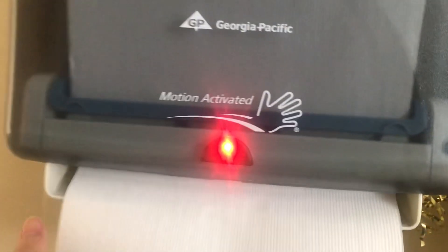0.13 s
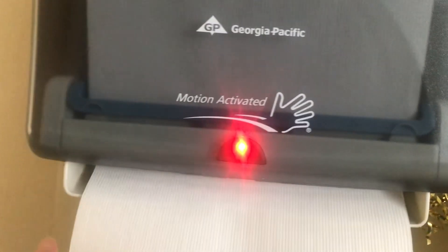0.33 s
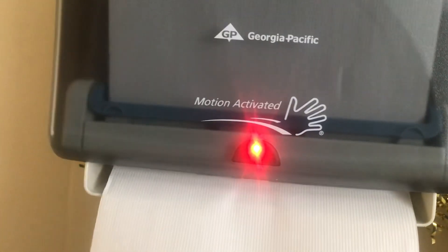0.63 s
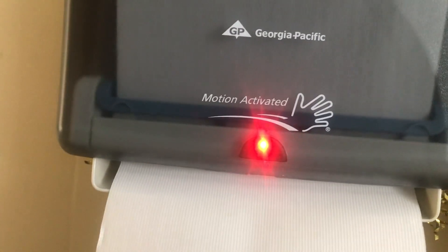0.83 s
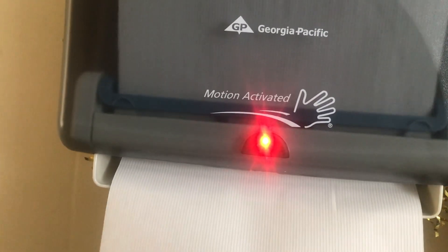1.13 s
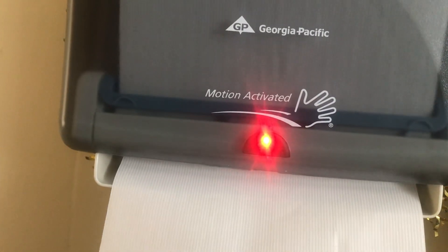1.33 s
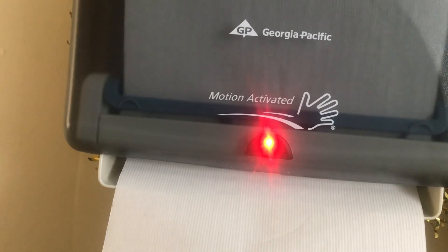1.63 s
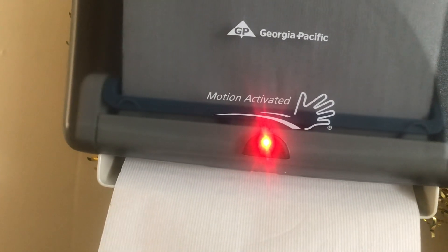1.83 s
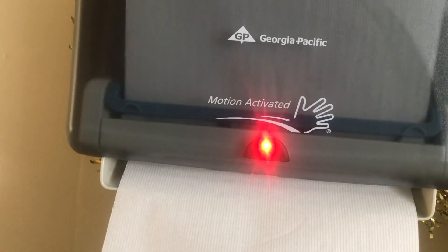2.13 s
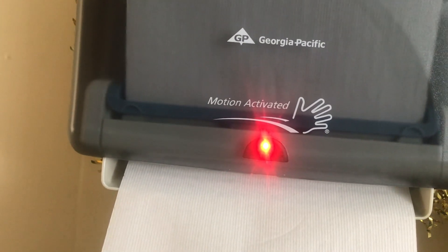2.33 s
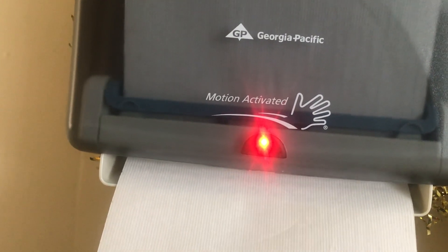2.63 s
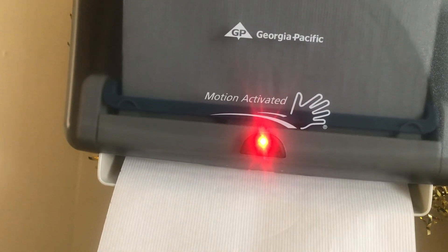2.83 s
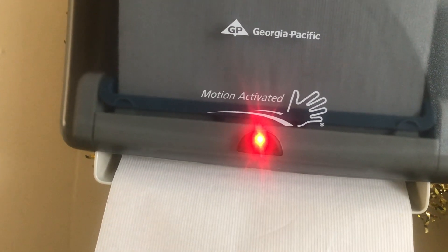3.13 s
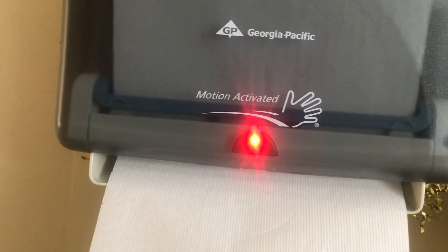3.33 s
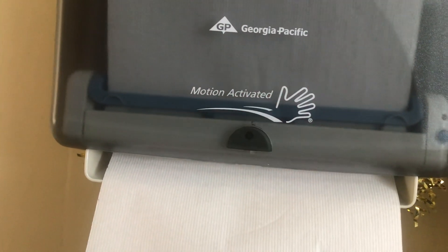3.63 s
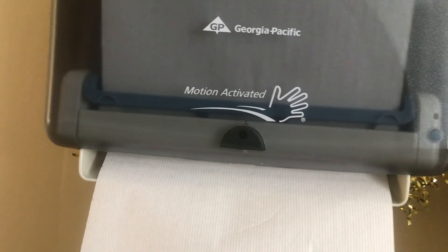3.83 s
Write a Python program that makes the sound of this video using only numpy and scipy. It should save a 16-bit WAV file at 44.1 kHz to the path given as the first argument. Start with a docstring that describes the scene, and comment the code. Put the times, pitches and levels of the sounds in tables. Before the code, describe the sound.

Paper towel dispenser motor whirring out a sheet, followed by two plastic clacks.

```python
"""Paper towel dispenser, close up

A small room, the microphone close to a motorised dispenser. Its geared motor hums, whines and rattles
the plastic case while it feeds a sheet, then is switched off and coasts to rest. Paper rustles softly,
a plastic part scrapes and clacks twice, and faint swishes of cloth pass over quiet ventilation."""
import sys
import numpy as np
from scipy import signal
from scipy.fft import rfft, irfft, next_fast_len
from scipy.io import wavfile
from scipy.ndimage import map_coordinates

SR = 44100
rng = np.random.default_rng(int(sys.argv[2]) if len(sys.argv) > 2 else 0)


def inscribe(sig):
    """Save sig as 16-bit PCM at rate SR to the path in sys.argv[1].

    A 1-D sig is mono; a 2-D sig holds one channel per row.
    Samples are clipped to [-1, 1] before scaling.
    """
    pcm = np.round(np.clip(np.atleast_2d(sig).T, -1, 1) * 32767)
    wavfile.write(sys.argv[1], SR, pcm.astype(np.int16))


N = 176400

# motor shaft under power (time [s], speed [turns/s])
SHAFT_SPEED = [(0, 135), (.035, 129), (.1, 127.2), (.21, 128.4), (.39, 130.4), (.47, 131), (.56, 127),
               (.66, 128.5), (.79, 130.6), (.92, 128), (1.0, 128), (1.06, 127.3), (1.2, 130.5),
               (1.32, 128.2)]
OFF_S, COAST_S, TEETH = 1.318, .27, 8  # power cut, time to rest, teeth on the gear
# shaft hum (time [s], level before trim [dB])
HUM_LEVEL = [(0, -46), (.05, -38), (.085, -46), (.125, -56), (.2, -46), (.33, -40), (.41, -45.5),
             (.48, -40.5), (.53, -43), (.62, -41), (.74, -37), (.81, -47.5), (.89, -39.5), (.97, -46.5),
             (1.04, -38.5), (1.15, -39.5), (1.19, -42), (1.27, -35.5), (1.33, -46)]
# gear whine (time [s], level before trim [dB])
WHINE_LEVEL = [(0.0, -31.5), (0.066, -42.5), (0.118, -35.5), (0.23, -44.5), (0.26, -38), (0.418, -33.5),
               (0.454, -47), (0.48, -32.5), (0.605, -44), (0.652, -37.5), (0.81, -40), (0.836, -58),
               (0.88, -28), (0.93, -35.5), (0.99, -38.5), (1.1, -34.5), (1.2, -31), (1.232, -40),
               (1.265, -27), (1.33, -33.5)]
# the whine's octave (time [s], level before trim [dB])
OCTAVE_LEVEL = [(0.0, -46), (0.08, -34.5), (0.336, -41.5), (0.44, -40), (0.466, -31.5), (0.532, -31.5),
                (0.602, -45), (0.636, -40), (0.81, -39.5), (0.918, -33.5), (1.05, -38), (1.13, -36.5),
                (1.222, -43), (1.274, -31.5), (1.315, -36.5), (1.335, -44)]
HUM_TRIM_DB, WHINE_TRIM_DB, OCTAVE_TRIM_DB = -1.5, -1.9, -2.5
HUM_FADE_DB_PER_S, WHINE_FADE_DB_PER_S = 196, 202  # once the power is cut
BOOM_HZ, BOOM_WIDTH_HZ, BOOM_DB = 880, 69, 14.5  # case resonance that the falling whine passes through
# whistle two octaves above the whine (time [s], level [dB])
WHISTLE_LEVEL = [(0, -52), (.09, -40.5), (.2, -48), (.27, -47.5), (.34, -52), (.65, -59), (.93, -47),
                 (1.33, -52)]
# drone at four times the shaft rate (time [s], level [dB])
DRONE_LEVEL = [(0, -48.5), (.5, -51), (.7, -55), (1.33, -56)]
# weaker tones of the gear train (frequency [multiples of the shaft rate])
GEAR_ORDERS = [2, 7.2, 9.2, 10.05, 12.65, 21, 23, 40, 64]
# the same tones, one by one (level [dB])
GEAR_ORDER_LEVELS = [-52, -53.5, -54, -49.5, -51, -58, -53.5, -53.5, -56]

# resonances of the plastic case (frequency [Hz], width [Hz], lift [dB])
CASE_RESONANCES = [(228, 48, 6.5), (603, 150, 8.5), (904, 120, 2), (1190, 420, 4.5), (1567, 87, 5),
                   (2090, 120, 2), (2658, 170, 9), (3064, 75, 8), (3720, 88, 3), (4200, 530, 6),
                   (5310, 210, 7.5), (5830, 390, 6), (6960, 270, 2.5), (8700, 490, 3)]
# gear rattle in the case (time [s], level before trim [dB])
RATTLE_LEVEL = [(0, -41), (.17, -44), (.24, -42.5), (.37, -39.5), (.6, -41), (.7, -39), (.82, -40),
                (.96, -37.5), (1.05, -39), (1.3, -38.5), (1.38, -34), (1.43, -40), (1.465, -39),
                (1.5, -44.5), (1.535, -48), (1.57, -57), (1.62, -70)]
# gears rattling under power (frequency [Hz], relative level [dB])
RATTLE_SPECTRUM = [(30, -26), (70, -4.5), (110, -4), (230, -6.5), (330, -6.5), (450, -5), (700, -12),
                   (950, -2), (1300, -4), (1600, -1.5), (2100, -5.5), (2500, -7), (3400, -16.5),
                   (4200, -20), (6000, -20.5), (15000, -40)]
# gears clattering as they coast (frequency [Hz], relative level [dB])
COAST_SPECTRUM = [(30, -29), (100, -23), (230, -5), (400, -9.5), (680, -13.5), (900, 2), (1350, -2.5),
                  (2000, -12.5), (2700, -12), (3500, -20), (6000, -27.5), (15000, -46)]
# paper sliding through the rollers (time [s], level before trim [dB])
FEED_LEVEL = [(0.0, -39), (0.708, -41.5), (0.73, -37.5), (0.756, -43), (0.846, -40.5), (1.304, -41.5),
              (1.312, -37.5), (1.42, -55), (1.466, -56), (1.564, -77), (1.576, -93), (1.6, -96)]
# hiss of the sliding paper (frequency [Hz], relative level [dB])
FEED_SPECTRUM = [(500, -20), (2000, 1), (4500, -2), (6500, -6.5), (9000, -7), (10300, -14), (12500, -9),
                 (14000, -15.5), (16000, -19)]
RATTLE_TRIM_DB, FEED_TRIM_DB = 1.94, 2.5

# ventilation (frequency [Hz], relative level [dB])
AIR_SPECTRUM = [(20, -23), (55, -1), (110, -5), (200, -11), (400, -18.5), (750, -20), (1400, -18),
                (2200, -27), (4000, -31), (6000, -31), (8000, -37), (11000, -37), (15500, -35.5)]
AIR_DB, MAINS_HZ, MAINS_DB = -63.5, 51.7, -67
# decay of the small room (frequency [Hz], t60 [s])
ROOM_DECAY = [(150, 0.36), (400, 0.21), (1800, 0.24), (5000, 0.18), (14000, 0.13)]
PLASTIC_SEND_DB, MECHANISM_SEND_DB = -9.5, -14.5  # into the reverberation

# gears skipping and paper ticking (time [s], knock level [dB], knock pitch [Hz], snap level [dB])
TICK_EVENTS = [(.1748, -18.5, 1100, -30), (.3685, -19.5, 2000, -42), (0.9604, -15.5, 1070, -27.5),
               (1.466, -32, 1193, -42), (1.672, -46.5, 1150, -60), (1.7683, -41, 3900, -39)]
# a tick's snap (frequency [Hz], relative level [dB])
TICK_SPECTRUM = [(600, -6), (2500, -5.5), (4300, 4.5), (7000, -10.5), (10000, -11.5), (15500, -15)]
TICK_T60_S, TICK_SNAP_T60_S = .012, 0.019
# tones lingering in the room once the power is cut (frequency [Hz], level [dB], t60 [s])
LINGERING_TONES = [(130.7, -43.5, 0.96), (148, -52.5, 1.76), (900, -44.5, 0.82)]

# soft paper rustle after the feed (time [s], level [dB])
RUSTLE_LEVEL = [(1.65, -95), (1.654, -57.5), (1.695, -54.5), (1.715, -50.5), (1.8, -54.5), (1.88, -57.5),
                (2.0, -56), (2.06, -59), (2.17, -57), (2.25, -61.5), (2.32, -71), (2.4, -90)]
# hiss of the rustle (frequency [Hz], relative level [dB])
RUSTLE_SPECTRUM = [(240, -45), (400, -9), (600, -7), (873, -3.5), (1560, -2.5), (2320, -1.5), (4500, -3),
                   (6500, -6.5), (9500, -13), (15500, -15.5)]
# resonances of the brushing sheet (middle [s], half length [s], level [dB], frequency [Hz], width [Hz])
SHEET_SCRATCHES = [(1.767, 0.056, -55.5, 2490, 1100), (2.0, 0.031, -67, 2130, 350),
                   (2.127, .07, -64.5, 3490, 130), (2.16, 0.03, -62, 6200, 1800),
                   (2.24, .06, -64.5, 1400, 300)]

# knocks and clacks of the plastic (time [s], body [dB], snap [dB], thud [dB], ring gain [dB])
CLACK_EVENTS = [(2.3665, -44, -52, -47, -84), (2.418, -52, -37, -56, -75), (2.4358, -26.5, -31, -38.5, -60),
                (2.491, -50, -53, -54, -82), (2.5915, -45, -33.5, -69, -75), (2.6167, -26, -42, -56, -42),
                (2.623, -30.5, -37.5, -49, -32), (2.983, -60.5, -85, -56, -90)]
# a clack's clattering body (frequency [Hz], relative level [dB])
BODY_SPECTRUM = [(200, -15), (550, -17), (850, 3.5), (1700, 4), (2800, -3.5), (3700, -5), (5000, -13),
                 (15000, -32)]
# its bright snap (frequency [Hz], relative level [dB])
SNAP_SPECTRUM = [(1500, -11), (3800, 0.5), (6500, -3), (8500, -2.5), (10500, -9.5), (12500, -1),
                 (16000, -14)]
# its low thud (frequency [Hz], relative level [dB])
THUD_SPECTRUM = [(40, -26), (80, -7), (130, 2), (220, -5), (420, -7.5), (800, -10.5), (2000, -45)]
# modes of the struck plastic (frequency [Hz], relative level [dB], t60 [s])
PLASTIC_MODES = [(807, -15, 0.12), (905, -14, 0.07), (1120, -15, 0.11), (1630, -11, 0.097), (1782, -8, .1),
                 (2435, 0, 0.092), (2490, -5, 0.075), (3640, -9, 0.07)]
BODY_T60_S, SNAP_T60_S, THUD_T60_S, RING_RISE_S = 0.038, 0.018, 0.23, 0.0044
# scrapes leading up to the two loud clacks (start [s], end [s], final level [dB], rise [dB])
SCRAPE_EVENTS = [(2.368, 2.431, -39, 10.5), (2.566, 2.61, -43, 3.5)]
# rubbing plastic (frequency [Hz], relative level [dB])
SCRAPE_SPECTRUM = [(60, -27), (110, -6), (450, -9.5), (800, -3.5), (1300, 1.5), (2100, -12), (2550, -5),
                   (3000, -10), (4200, -11), (7400, -22.5), (13000, -27.5), (15500, -32)]
SCRAPE_ATTACK_S, SCRAPE_RELEASE_S = 0.024, 0.025

# faint swishes, as of a moving sleeve (middle [s], half length [s], level [dB], hiss pitch [Hz])
SWISH_EVENTS = [(2.813, 0.083, -61, 3830), (2.93, 0.039, -66, 3500), (3.151, 0.043, -60, 5860),
                (3.26, 0.048, -66.5, 5700), (3.471, 0.1, -61, 5600), (3.682, 0.115, -66, 5700),
                (3.939, 0.031, -69, 4000)]
# brushing cloth (frequency [Hz], relative level [dB])
SWISH_SPECTRUM = [(400, -26), (900, -3), (1150, -8), (1420, 4), (1900, -5.5), (3000, -6), (6300, -13),
                  (7500, -17), (15000, -26)]
SWISH_WIDTH_HZ, SWISH_LIFT_DB, SWISH_EDGE_S = 750, 7.5, 0.013
TOP_HZ = 15830


def amp(db):
    """Decibels to gain."""
    return 10 ** (np.asarray(db) / 20)


def unit(x):
    """Scale to rms 1."""
    return x / np.sqrt(np.mean(x ** 2) + 1e-20)


def clock():
    """Time of each sample in seconds."""
    return np.arange(N) / SR


def along(points, hz):
    """Read (frequency, value) points at hz, on a log axis."""
    frequencies, values = np.transpose(points)
    return np.interp(np.log(hz + 1), np.log(frequencies + 1), values)


def curve(points):
    """Join (time, value) points, one value per sample."""
    return np.interp(clock(), *np.transpose(points))


def wobble(rate):
    """A smooth random curve, rate knots a second."""
    return map_coordinates(rng.standard_normal(8000), [clock() * rate], mode="wrap")


def filtered(x, response):
    """Filter x by a gain given as a function of frequency."""
    size = next_fast_len(N + SR // 2)
    return irfft(rfft(x, size) * response(np.fft.rfftfreq(size, 1 / SR)), size)[:N]


def noise(spectrum):
    """Coloured noise of rms 1."""
    return unit(filtered(rng.standard_normal(N), lambda hz: amp(along(spectrum, hz))))


def grains(rate, spread_db):
    """Tiny random contacts of uneven size, rate a second."""
    contacts = rng.random(N) < rate / SR
    return unit(contacts * rng.standard_normal(N) * amp(spread_db * rng.standard_normal(N)))


def resonance(hz, centre, width):
    """A resonant peak of height 1."""
    return 1 / (1 + (2 * (hz - centre) / width) ** 2)


def through_case(x, spectrum):
    """Colour x and lift it at the resonances of the plastic case."""
    def lift_db(hz):
        return sum(db * resonance(hz, centre, width) for centre, width, db in CASE_RESONANCES)
    return unit(filtered(x, lambda hz: amp(along(spectrum, hz) + lift_db(hz))))


def shaft():
    """Turns of the motor shaft, and its share of full speed as it coasts to rest."""
    running = np.clip(1 - (clock() - OFF_S) / COAST_S, 0, 1)
    return np.cumsum(curve(SHAFT_SPEED) * running) / SR, running


def gear_tones(turns, running):
    """The shaft hums and the meshing teeth whine; the tones sink and fade once the power is cut."""
    def tone(order, slip_rad, flutter_db):
        phase = 2 * np.pi * order * turns + slip_rad * wobble(69.84)
        return np.sqrt(2) * np.sin(phase) * amp(flutter_db * wobble(34.92))
    coasting_s = np.maximum(clock() - OFF_S, 0)
    whine_hz = TEETH * curve(SHAFT_SPEED) * running
    boom_db = BOOM_DB * np.exp(-((whine_hz - BOOM_HZ) / BOOM_WIDTH_HZ) ** 2)
    hum_db = curve(HUM_LEVEL) + HUM_TRIM_DB - HUM_FADE_DB_PER_S * coasting_s
    hum = amp(hum_db) * tone(1, slip_rad=0.11, flutter_db=1.5)
    whine = amp(curve(WHINE_LEVEL) + WHINE_TRIM_DB + boom_db) * tone(TEETH, 0.42, 2)
    octave = amp(curve(OCTAVE_LEVEL) + OCTAVE_TRIM_DB) * tone(2 * TEETH, 0.49, 0.9)
    whistle = amp(curve(WHISTLE_LEVEL)) * tone(4 * TEETH, 0.48, 3.0)
    drone = amp(curve(DRONE_LEVEL)) * tone(4, 0.53, 2.5)
    weak_tones = sum(amp(db) * tone(order, 0.57, 3.0) for order, db in zip(GEAR_ORDERS, GEAR_ORDER_LEVELS))
    fade = amp(-WHINE_FADE_DB_PER_S * coasting_s)
    return hum + fade * whine + fade ** 2 * (octave + whistle + drone + weak_tones)


def gear_rattle(pulsing):
    """Gears chatter in the case, duller and looser when coasting."""
    slack = np.clip((clock() - OFF_S) / 0.054, 0, 1)
    contacts = unit(grains(4000, spread_db=2.5) + 0.93 * rng.standard_normal(N))
    chatter = contacts * pulsing * amp((1 + slack) * wobble(130))
    driven = through_case(chatter, RATTLE_SPECTRUM)
    coasting = amp(-1.0) * through_case(chatter, COAST_SPECTRUM)
    return amp(curve(RATTLE_LEVEL) + RATTLE_TRIM_DB) * ((1 - slack) * driven + slack * coasting)


def paper_feed(pulsing):
    """The sheet slides through the rollers with a fine hiss, coloured by the case."""
    friction = grains(16000, spread_db=0.5) * pulsing * amp(0.44 * wobble(60.1))
    return amp(curve(FEED_LEVEL) + FEED_TRIM_DB) * through_case(friction, FEED_SPECTRUM)


def room_tone():
    """Quiet ventilation with a low drone."""
    drone = np.sqrt(2) * np.sin(2 * np.pi * MAINS_HZ * clock() + 0.89 * wobble(6.2))
    return amp(AIR_DB + 0.93 * wobble(6.05)) * noise(AIR_SPECTRUM) + amp(MAINS_DB) * drone


def reverberation(x):
    """The small room's short tail at the microphone; the treble dies first."""
    hz, t, spectra = signal.stft(rng.standard_normal(SR // 2), SR, nperseg=256)
    decay = amp(-60 * t / along(ROOM_DECAY, hz)[:, None])
    tail = signal.istft(spectra * decay, SR, nperseg=256)[1]
    return signal.fftconvolve(x, tail / np.linalg.norm(tail))[:N]


def ticks():
    """Gears skip and paper ticks: each is one dead knock with a crisp snap."""
    out, t = np.zeros(N), np.arange(SR // 10) / SR
    snap = noise(TICK_SPECTRUM)
    for start, knock_db, hz, snap_db in TICK_EVENTS:
        span = slice(round(start * SR), round(start * SR) + len(t))
        knock = amp(knock_db - 60 * t / TICK_T60_S) * np.sin(2 * np.pi * hz * t)
        out[span] += knock + snap[span] * amp(snap_db - 60 * t / TICK_SNAP_T60_S)
    return out


def lingering_hum():
    """A low hum and a faint higher tone linger briefly in the room after the motor is switched off."""
    t = np.maximum(clock() - OFF_S, 0)
    tones = sum(amp(db - 60 * t / t60) * np.sin(2 * np.pi * hz * t + 0.73 * wobble(40))
                for hz, db, t60 in LINGERING_TONES)
    return np.sqrt(2) * tones * (1 - np.exp(-t / .02))


def rustle():
    """Paper brushes softly: an even, fine hiss in which narrow scratches come and go."""
    out = noise(RUSTLE_SPECTRUM) * amp(curve(RUSTLE_LEVEL) + wobble(44.9))
    for middle, half, db, centre, width in SHEET_SCRATCHES:
        scratch = unit(filtered(rng.standard_normal(N), lambda hz: resonance(hz, centre, width)))
        out += amp(db) * scratch * np.exp(-.5 * ((clock() - middle) / half) ** 2)
    return out


def clacks():
    """Each blow on the plastic gives a short clatter, a bright snap, a case thud and ringing modes."""
    out, t = np.zeros(N + SR), np.arange(SR // 3) / SR
    body_noise, snap_noise, thud_noise = noise(BODY_SPECTRUM), noise(SNAP_SPECTRUM), noise(THUD_SPECTRUM)
    attack = 1 - np.exp(-t / 0.00067)
    for start, body_db, snap_db, thud_db, ring_db in CLACK_EVENTS:
        span = slice(round(start * SR), round(start * SR) + len(t))
        body = body_noise[span] * amp(body_db - 60 * t / BODY_T60_S)
        snap = snap_noise[span] * amp(snap_db - 60 * t / SNAP_T60_S)
        thud = thud_noise[span] * amp(thud_db - 60 * t / THUD_T60_S) * (1 - np.exp(-t / 0.002))
        modes = sum(amp(db - 60 * t / t60) * np.sin(2 * np.pi * (hz * t + rng.random()))
                    for hz, db, t60 in PLASTIC_MODES)
        ring = amp(ring_db) * modes * (1 - np.exp(-t / RING_RISE_S))
        out[span] += (body + snap + thud + ring) * attack
    return out[:N]


def scrapes():
    """Plastic rubs harder and harder until it gives."""
    t, level = clock(), np.zeros(N)
    for start, end, db, rise_db in SCRAPE_EVENTS:
        attack = np.exp(-np.maximum(start - t, 0) / SCRAPE_ATTACK_S)
        release = np.exp(-np.maximum(t - end, 0) / SCRAPE_RELEASE_S)
        level += attack * release * amp(db - rise_db * np.clip((end - t) / (end - start), 0, 1))
    friction = grains(14000, spread_db=1.5)
    return level * unit(filtered(friction, lambda hz: amp(along(SCRAPE_SPECTRUM, hz))))


def swishes():
    """Cloth brushes past in short soft strokes."""
    out = np.zeros(N)
    for middle, half, db, hiss_hz in SWISH_EVENTS:
        hiss = filtered(noise(SWISH_SPECTRUM),
                        lambda hz: amp(SWISH_LIFT_DB * np.exp(-((hz - hiss_hz) / SWISH_WIDTH_HZ) ** 2)))
        stroke = .5 * (1 + np.tanh((half - np.abs(clock() - middle)) / SWISH_EDGE_S))
        out += amp(db) * unit(hiss) * stroke
    return out


def scene():
    """The dispenser from close by: mostly direct sound, with a little of the room behind it."""
    turns, running = shaft()
    plastic = clacks() + scrapes() + ticks()
    # rattle and paper pulse with the shaft and with a gear a third as fast
    pulsing = 1 + 0.074 * np.cos(2 * np.pi * turns) + 0.076 * np.cos(2 * np.pi * turns / 3)
    fade_at_rest = amp(-200 * np.maximum(clock() - OFF_S - COAST_S, 0))
    mechanism = fade_at_rest * (gear_rattle(pulsing) + paper_feed(pulsing))
    motor = gear_tones(turns, running) + mechanism + lingering_hum()
    echo = reverberation(amp(PLASTIC_SEND_DB) * plastic + amp(MECHANISM_SEND_DB) * mechanism)
    return (motor + rustle() + swishes() + plastic + echo + room_tone())[None]


def record(dry):
    """One microphone, mono, with nothing kept above TOP_HZ."""
    return filtered(dry[0], lambda hz: hz < TOP_HZ)[None]


dry = scene()
out = record(dry)
inscribe(out)
```